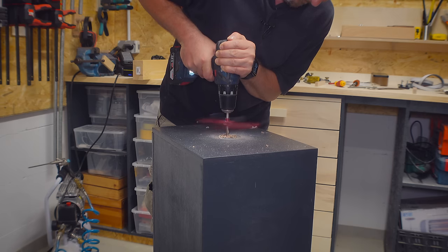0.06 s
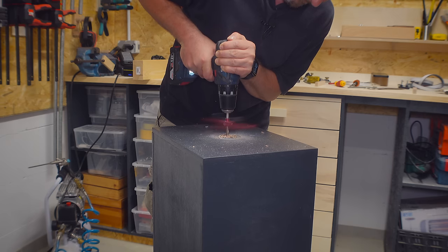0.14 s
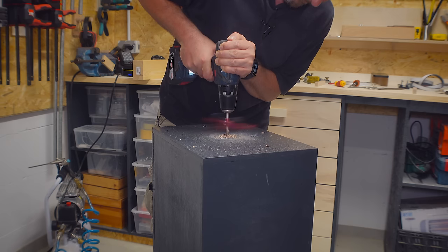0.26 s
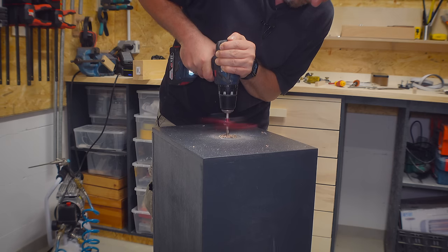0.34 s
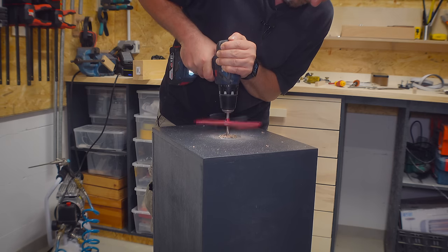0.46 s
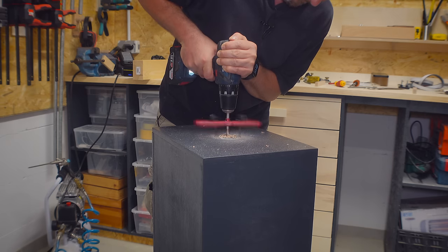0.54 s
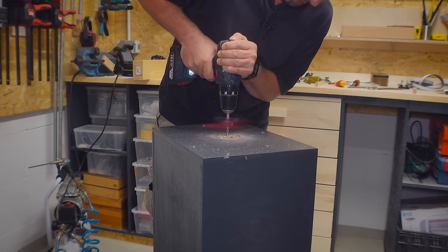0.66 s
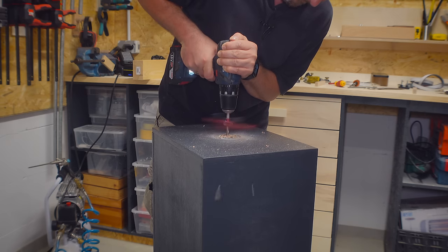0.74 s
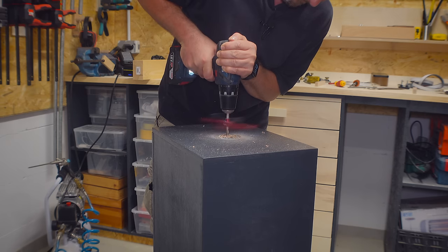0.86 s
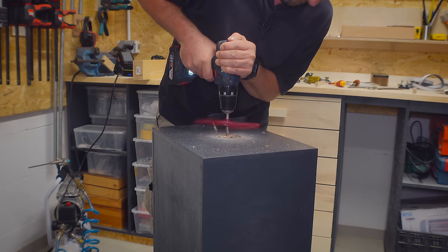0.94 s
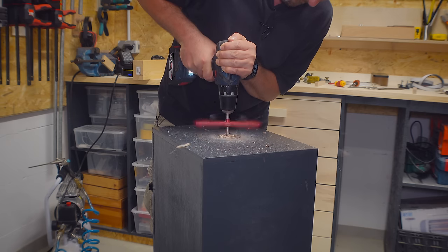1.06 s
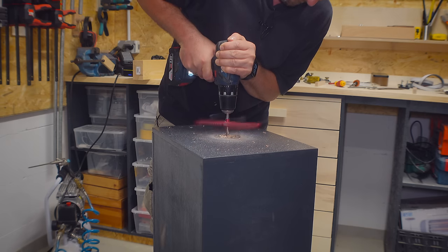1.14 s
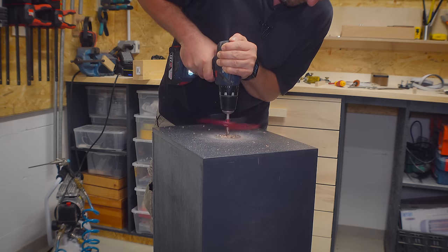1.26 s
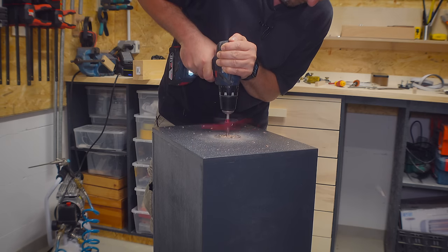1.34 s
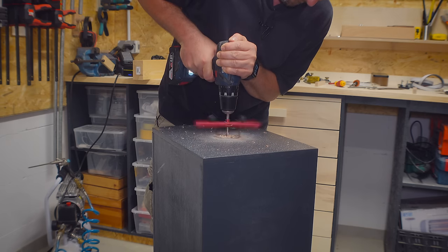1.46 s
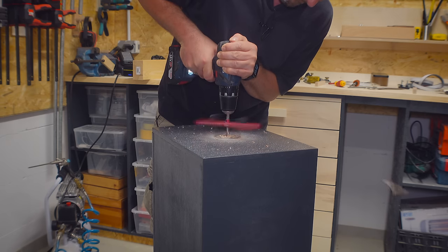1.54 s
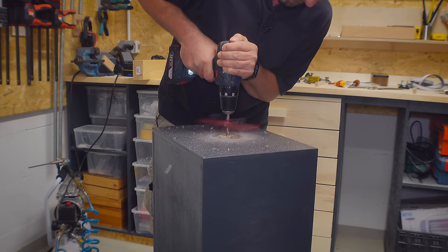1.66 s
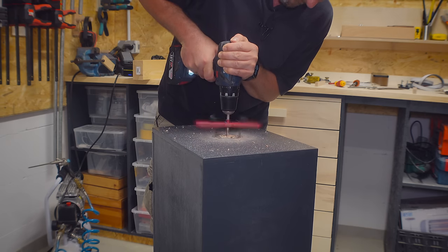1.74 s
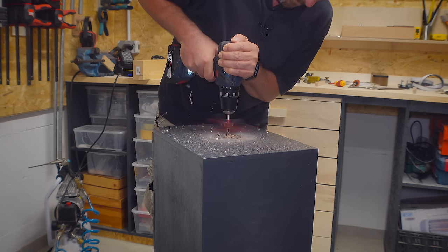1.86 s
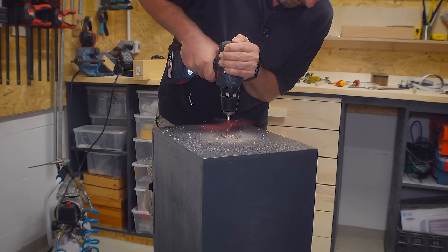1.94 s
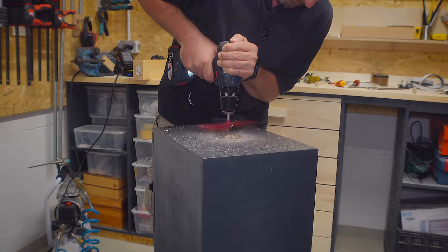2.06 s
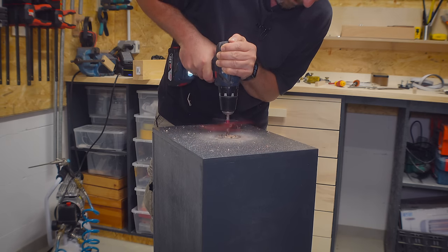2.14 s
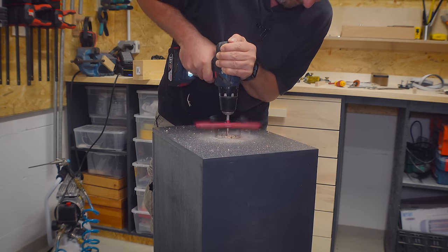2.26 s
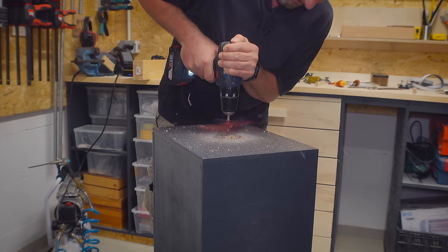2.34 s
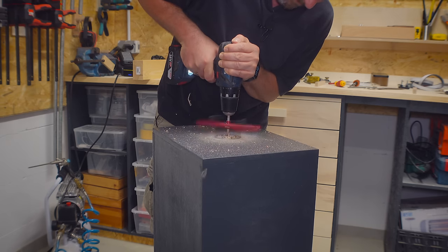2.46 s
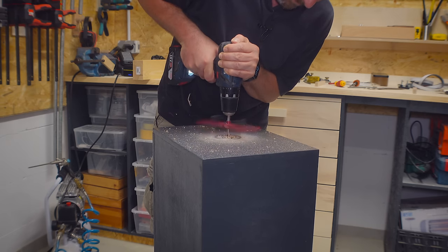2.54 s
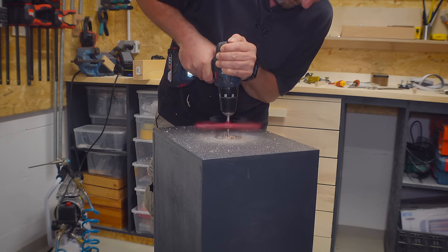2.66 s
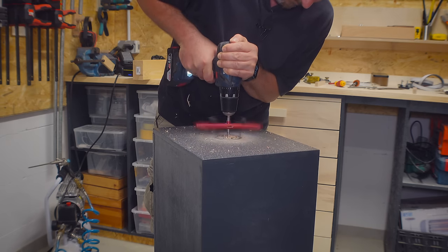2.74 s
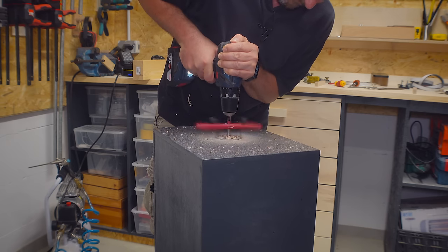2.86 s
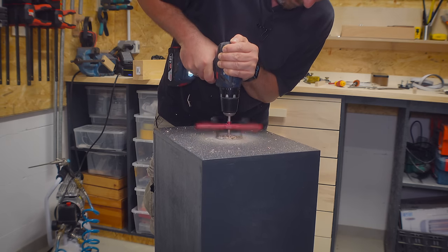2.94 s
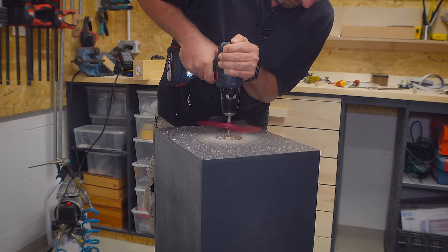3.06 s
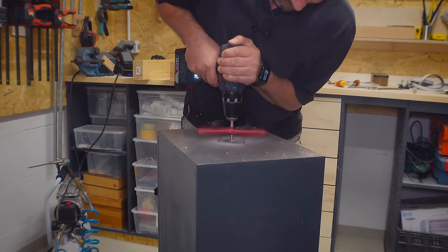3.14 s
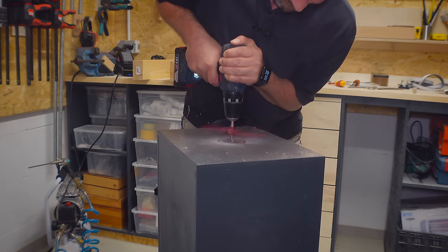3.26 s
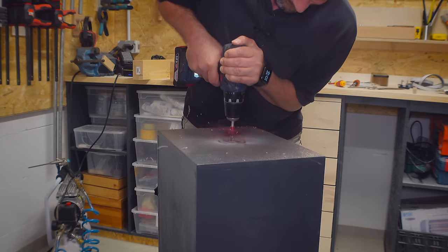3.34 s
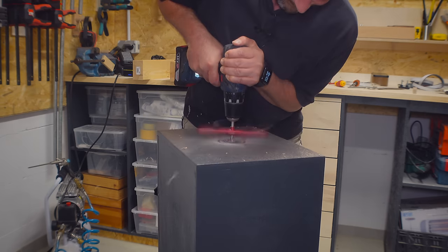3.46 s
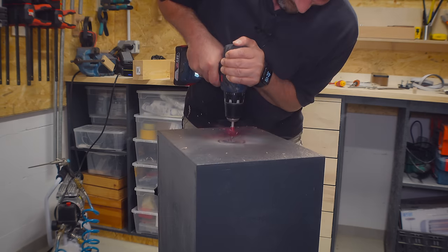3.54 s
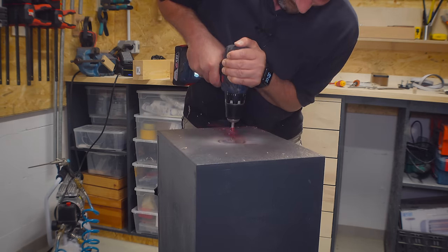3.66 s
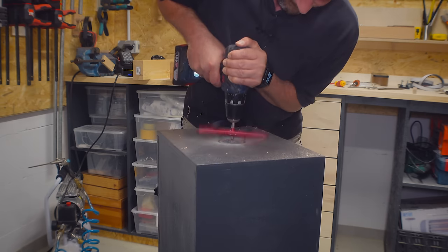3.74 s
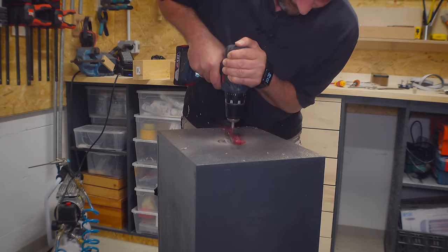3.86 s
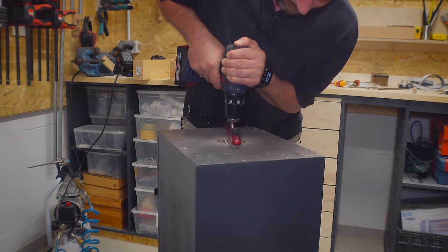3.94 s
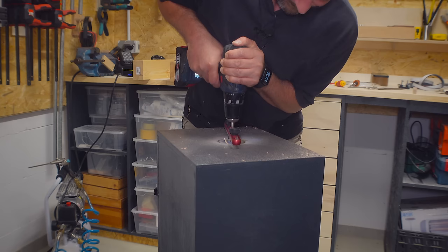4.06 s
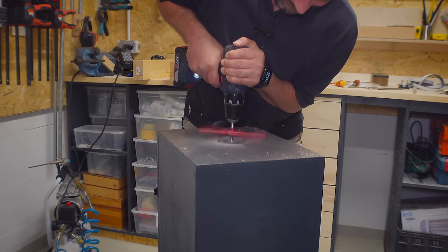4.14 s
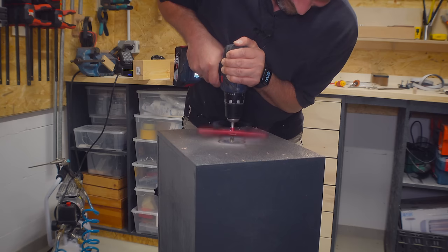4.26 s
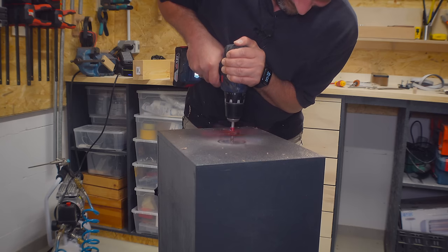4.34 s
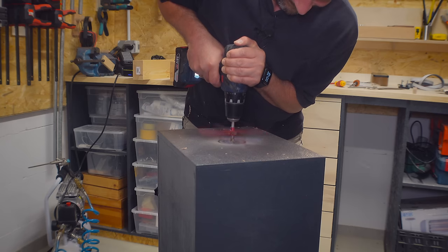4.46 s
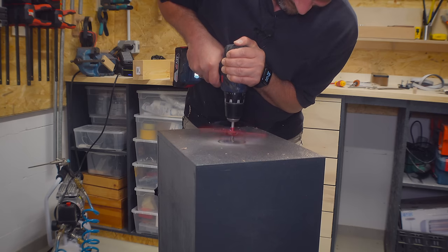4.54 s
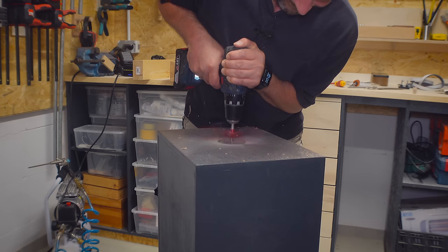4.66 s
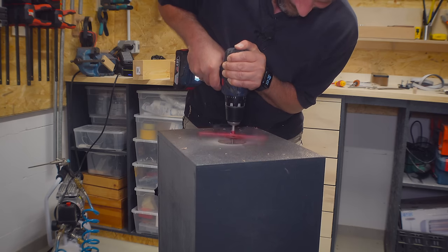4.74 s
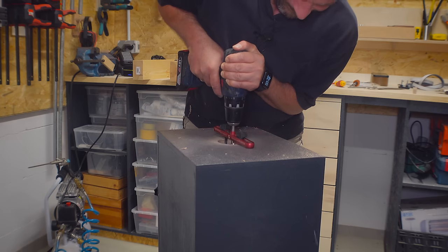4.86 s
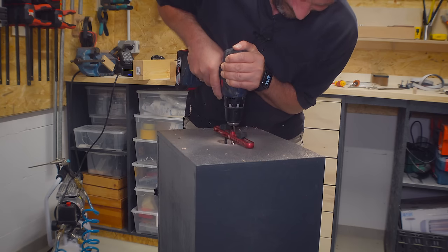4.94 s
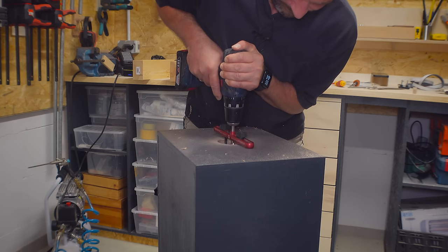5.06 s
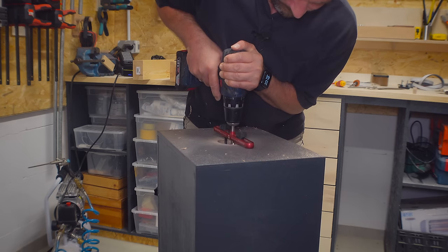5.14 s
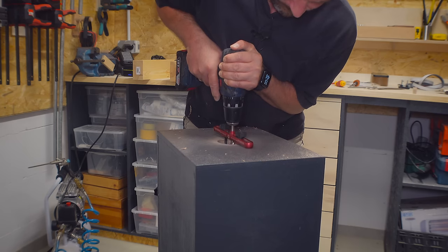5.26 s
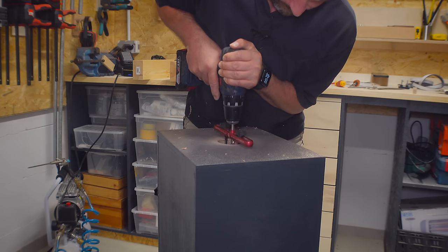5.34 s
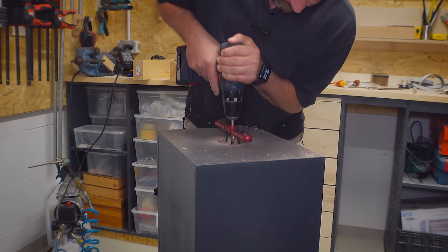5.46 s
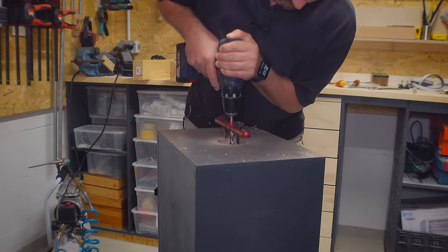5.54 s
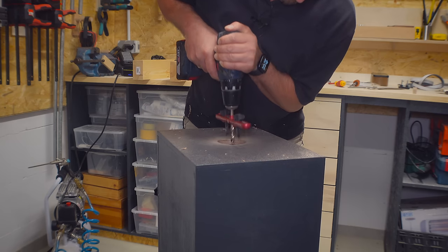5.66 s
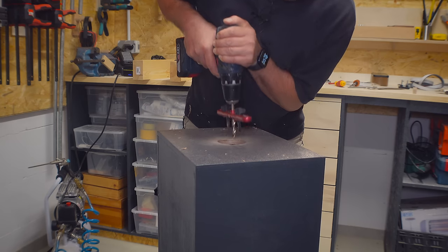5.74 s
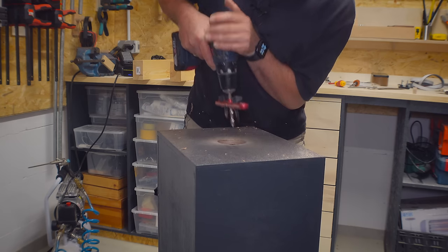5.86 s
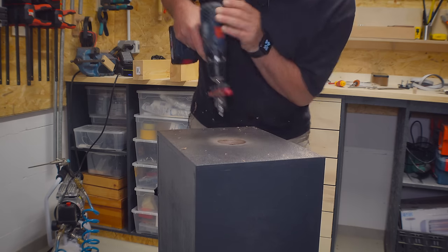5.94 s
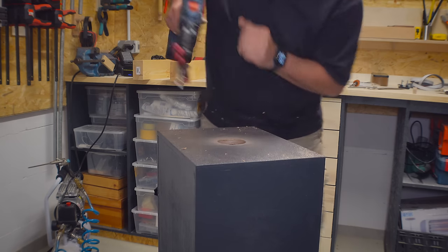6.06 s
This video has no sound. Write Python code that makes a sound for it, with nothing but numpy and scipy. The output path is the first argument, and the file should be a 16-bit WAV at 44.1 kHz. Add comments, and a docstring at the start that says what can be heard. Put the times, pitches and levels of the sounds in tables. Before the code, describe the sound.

In a small workshop, a cordless drill turns a circle cutter in a hollow boxy board. The rasping cut growls and hisses with a wavering gear whine, then bogs down and judders. Abruptly a harsher, squealing cut takes over, stutters, pauses briefly and surges again. The drill stops, the cutter knocks woodily in its groove, and faint cloth rustles as it is lifted. Fairly close microphone, short room reverberation.

```python
"""A rasping, juddering cut is heard first: a cordless drill drags a circle cutter round a boxy board. Its
blades stick and slip, exciting board and blade resonances and tearing chips, in a small workshop. The gear
whines at its tooth rate and the tips squeal; the scene changes to a second cut in trigger pulls. The drill
stops, the cutter knocks in its groove as decaying modes, and it is lifted out with a rustle."""
import sys
import numpy as np
from scipy import signal
from scipy.fft import rfft, irfft
from scipy.io import wavfile
from scipy.ndimage import uniform_filter1d, map_coordinates

SR = 44100
rng = np.random.default_rng(int(sys.argv[2]) if len(sys.argv) > 2 else 0)


def dump(signal):
    """Clip the signal to [-1, 1] and save it as 16-bit WAV at the path in sys.argv[1]."""
    limited = np.clip(np.atleast_2d(signal).T, -1, 1)
    pcm = np.round(limited * 32767).astype(np.int16)
    wavfile.write(sys.argv[1], SR, pcm)


N = 269007
T = np.arange(N) / SR

CHANGE_S = 3.174  # the scene changes abruptly to the second cut
LOOSE_S = 2.52  # the first groove is cut and the blades work loose
CATCH_BUILD_S = 0.002  # build-up of a judder, and return of the cutting after a catch
BOARD_SHIFT = 0.03  # rms share by which the board's resonances drift at random

# How the board radiates its vibration. Each row: frequency in Hz, gain in dB.
BOARD_RADIATION = [(25, -12.5), (70, 12), (150, -2.5), (400, -4), (1300, 0), (2000, -4), (3000, -24),
                   (6000, -22.5), (16000, -44)]
# Resonances of the board shaken by a juddering blade. Each row: frequency in Hz, width in Hz, gain in dB.
LOOSE_BOARD_MODES = [(131.9, 54, -16), (246, 56, -1.5), (324, 130, -2), (463, 90, 4), (663, 130, 0),
                     (1030, 130, -6), (1230, 130, -11.5), (1627, 240, -18.5)]
# Spectrum of the chips off a fresh face. Each row: frequency in Hz, gain in dB.
FRESH_CHIP_SPECTRUM = [(500, 0.5), (2500, 2), (3300, -5.5), (4100, 2), (4900, 4), (5700, -1.5), (6700, 5),
                       (8500, -4.5), (9900, 1.5), (12000, -2.5), (13200, -1.5), (15700, -12.5)]
# The hardest catches of a blade in the groove. Each row: start in seconds, peak level of the judder
# in dB before a common trim, its middle pitch in Hz, peak of the crack in dB relative to the judder.
CATCHES = [(0.360, -17, 495, -13.5), (.445, -17, 495, -5.5), (0.883, -14.5, 583, -9.5),
           (2.27, -16, 483, -9), (2.311, -15, 432, -37), (2.532, -23, 702, -7), (2.58, -22, 428, -12),
           (2.615, -18.5, 520, -10), (2.656, -18.5, 452, -18), (2.701, -17.5, 448, -16),
           (2.735, -20.5, 245, -17.5), (2.766, -21.5, 435, -18), (2.9, -22.5, 240, -18),
           (2.974, -19.5, 498, -14), (3.175, -13, 460, -4), (3.188, -20, 500, -11.5),
           (3.213, -22.5, 442, -12), (3.228, -11.5, 433, -5.5), (3.262, -16.5, 441, -17),
           (3.29, -17.5, 450, -15), (3.328, -15.5, 418, -9), (3.342, -13, 448, -8),
           (3.365, -15, 493, -10.5), (3.425, -16.5, 440, -10), (3.484, -16.5, 419, -12.5),
           (3.502, -22, 480, -12), (3.547, -18, 480, -6.5), (3.561, -17.5, 680, -10),
           (3.731, -13.5, 1035, -13), (3.805, -16.5, 475, -29), (3.832, -25, 576, 3.5),
           (3.897, -18.5, 472, -30), (3.938, -27, 466, -6.5), (4.245, -16.5, 465, -10),
           (4.289, -13, 467, -11.5), (4.33, -22.5, 500, -7.5), (4.363, -16, 430, -2),
           (4.398, -16.5, 479, -12.5), (4.415, -13.5, 445, -4.5), (4.477, -18.5, 459, 1.5),
           (4.516, -20.5, 471, 0.5), (4.535, -14.5, 455, -8.5), (4.573, -21.5, 440, -13),
           (4.594, -13.5, 680, -16.5), (4.656, -14.5, 475, -20), (4.711, -24.5, 462, -21),
           (4.803, -31, 476, -3), (4.856, -28, 480, -12)]
# The stopped cutter knocks. Each row: start in seconds, peak level in dB, dulling corner in Hz,
# length of the ring as a factor.
KNOCKS = [(5.238, -18, 9070, 1.04), (5.243, -22.5, 3200, .85), (5.252, -21.5, 3380, 0.93),
          (5.266, -27, 2390, 0.93), (5.405, -33.5, 1000, 2)]
# First cut, how hard the blades are pressed in. Each row: time in seconds, board rumble in dB
# before a small trim.
PRESSURE = [(0.0, -28), (0.35, -28), (0.62, -28.5), (0.85, -26.5), (1.0, -28.5), (1.55, -30.5),
            (1.78, -28.5), (2.14, -29.5), (2.29, -26.5), (2.4, -34), (2.53, -32.5), (2.63, -29.5),
            (2.75, -28.5), (2.83, -34), (2.98, -31), (3.1, -38.5), (3.17, -37.5)]
# The blade tips sing in the groove. Each row: time in seconds, pitch in Hz, level in dB.
SONG = [(0, 3250, -59), (.7, 3100, -49.5), (1.15, 3264, -47), (1.45, 3210, -53), (1.85, 3080, -60.5),
        (2.0, 2580, -73), (2.655, 2305, -59), (2.68, 2770, -42), (2.72, 3020, -52), (2.77, 2850, -49.5),
        (2.81, 2400, -61), (3.165, 2490, -52), (3.2, 2620, -47.5), (3.47, 2830, -46.5), (3.53, 3110, -44.5),
        (3.62, 2930, -40), (3.74, 2456, -56.5), (3.99, 1798, -100), (4.16, 1705, -100), (4.27, 1998, -48),
        (4.35, 2800, -42.5), (4.41, 3116, -44), (4.53, 3226, -39), (4.79, 3300, -40), (4.83, 3330, -43.5),
        (4.91, 3220, -52), (5.0, 3010, -130)]


def undb(db):
    """Logarithmic level: decibels become an amplitude gain."""
    return 10 ** (np.asarray(db) / 20)


def curves(table):
    """Linear interpolation: the columns of a table of timed rows, at every sample."""
    s, *columns = np.transpose(table)
    return [np.interp(T, s, c) for c in columns]


def ramp(start_s, length_s):
    """Linear onset: rises from 0 to 1 and stays there."""
    return np.clip((T - start_s) / length_s, 0, 1)


def swell(start_s, end_s, rise_s, fall_s):
    """Envelope: attack, hold and release between 0 and 1."""
    return ramp(start_s, rise_s) * (1 - ramp(end_s, fall_s))


def lag(x, time_s):
    """Inertia: a first-order low-pass makes a control approach its target exponentially."""
    keep = np.exp(-1 / (time_s * SR))
    return signal.lfilter([1 - keep], [1, -keep], x)


def unit(x, band=None):
    """Normalisation: scale to a standard deviation of 1, overall or within a band."""
    if band is None:
        return x / np.std(x)
    band_pass = signal.butter(4, band, "band", fs=SR, output="sos")
    return x / np.std(signal.sosfilt(band_pass, x))


def add(track, s, sound):
    """Superposition: mix a sound in at a time."""
    i = max(int(s * SR), 0)
    track[i:i + len(sound)] += sound[:max(N - i, 0)]


def colour(x, points, size=2048):
    """Minimum-phase filtering: a causal response through (Hz, dB) points, by the folded cepstrum."""
    hz, db = np.transpose(points)
    grid = np.maximum(np.arange(size // 2 + 1) * SR / size, 1)
    cepstrum = irfft(np.log(undb(np.interp(np.log(grid), np.log(hz), db))))
    cepstrum[1:size // 2] *= 2
    cepstrum[size // 2 + 1:] = 0
    impulse = irfft(np.exp(rfft(cepstrum)))
    return signal.oaconvolve(x, impulse)[:len(x)]


def resonate(x, modes):
    """Modal superposition: parallel resonances, neighbours moving in opposite directions."""
    total = 0
    for k, (hz, width, db) in enumerate(modes):
        b, a = signal.iirpeak(hz, hz / width, SR)
        total = total + (-1) ** k * undb(db) * signal.lfilter(b, a, x)
    return total


def bend(x, ratio):
    """Time warping: reading a sound at a changing rate shifts all its pitches by that ratio."""
    return map_coordinates(x, [np.cumsum(ratio * np.ones(N))], mode="mirror")


def walk(rate):
    """Random modulation: smoothed chance values, rate per second, with a spread of 1."""
    k = max(int(SR / rate), 1)
    held = np.repeat(rng.standard_normal(N // k + 1), k)[:N]
    return unit(uniform_filter1d(held, k))


def grains(rate, spread_db):
    """Shot noise of fibres snapping: clicks of random sign, size and time, rate per second."""
    snaps = rng.random(N) < rate / SR
    return unit(snaps * rng.choice([-1, 1], N) * undb(spread_db * rng.uniform(-1.1, 1, N)))


def stick_slip(rate, jitter, spread_db, spray_s):
    """Stick-slip friction: uneven slips of the blades, each followed by a decaying spray of chips."""
    count = np.floor(np.cumsum(rate * np.exp(jitter * walk(rate))) / SR)
    slips = np.diff(count, prepend=0) * undb(spread_db * rng.uniform(-0.96, 1, N))
    spray = signal.lfilter([1], [1, -np.exp(-1 / (spray_s * SR))], slips)
    return unit(slips), spray / np.sqrt(np.mean(spray ** 2))


def whine(hz, width_hz, clean):
    """Narrow-band modulation: a steady core plus random sidebands, around a wavering rate."""
    low_pass = signal.butter(2, width_hz / 2, fs=SR, output="sos")
    smear = unit(signal.sosfilt(low_pass, rng.standard_normal((2, N))))
    waver = 1 + .011 * walk(70) + .016 * walk(400)
    phase = 2 * np.pi * np.cumsum(hz * waver) / SR
    line = (clean + smear[0]) * np.cos(phase) + smear[1] * np.sin(phase)
    return unit(line * undb(2 * walk(50)))


def background():
    """Shaped broadband noise: still workshop air, and sleeves rustling as the drill is lifted."""
    # The rustle of sleeves. Each row: time in seconds, level in dB.
    rustle_levels = [(5.6, -81.5), (5.85, -84), (5.905, -65.5), (5.96, -77), (5.995, -75), (6.04, -63),
                     (6.1, -65)]
    # Spectra of the cloth and of the air. Each row: frequency in Hz, gain in dB.
    cloth_spectrum = [(24, -38.5), (60, -12), (153, -9), (260, -17), (15000, -32)]
    air_spectrum = [(15, -30.5), (30, -7), (500, -7), (1280, -14), (15000, -28.5)]
    air_db = -79.5
    rustle = unit(colour(grains(rate=10000, spread_db=8.0) * undb(2.3 * walk(64)), cloth_spectrum))
    air = unit(colour(rng.standard_normal(N), air_spectrum))
    return rustle * undb(curves(rustle_levels)[0]) + undb(air_db) * air


def workshop(x, wet_db, low_t60, high_t60, size=26000):
    """Reverberation: cluttered walls return decaying noise, with its own t60 below and above 1800 Hz."""
    t = T[:size]
    low_pass = signal.butter(2, 1800, fs=SR, output="sos")
    high_pass = signal.butter(2, 1800, "high", fs=SR, output="sos")
    low = signal.sosfilt(low_pass, rng.standard_normal(size)) * undb(-60 * t / low_t60)
    high = signal.sosfilt(high_pass, rng.standard_normal(size)) * undb(-60 * t / high_t60)
    tail = (low + 0.64 * high) * (t > .005)
    return x + undb(wet_db) * signal.oaconvolve(x, tail / np.linalg.norm(tail))[:N]


def boom():
    """Cavity resonance: each knock sets the air in the box swinging at one low pitch."""
    boom_hz, t60_s = 68, 0.57
    relative_db = -47  # level relative to the knock, before the halving below
    total = 0
    for s, db, *_ in KNOCKS:
        decay = undb(db + relative_db - 60 * np.maximum(T - s, 0) / t60_s)
        total = total + ramp(s, .01) * np.sin(2 * np.pi * boom_hz * T) * decay
    return total / 2


def knocks(size=14000):
    """Impact on a modal body: decaying modes and a crunch build up, then pass the contact's low-pass."""
    # Modes of the knock. Each row: frequency in Hz, level in dB, t60 in seconds before the length factor.
    knock_modes = [(236.4, -7.5, 0.14), (310, 0, 0.042), (417, 6, 0.03), (537, -5, 0.048),
                   (625, 7.5, 0.043), (748, -6, 0.059), (870, -1, 0.06), (1104, -1.5, 0.074),
                   (1470, -10, 0.038), (1780, -13, 0.042), (2200, -14, 0.068), (3070, -6.5, 0.031)]
    crunch_spectrum = [(150, -16), (500, 9.0), (1200, 2.5), (3200, -10), (4600, -30.0), (15000, -30)]
    out, t = np.zeros(N), T[:size]
    for s, db, corner_hz, length in KNOCKS:
        ring = np.zeros(size)
        for k, (hz, mode_db, t60) in enumerate(knock_modes):
            detune = 1 + 0.0066 * rng.standard_normal()
            decay = undb(mode_db - 60 * t / (t60 * length))
            ring += (-1) ** k * decay * np.sin(2 * np.pi * hz * t * detune)
        crunch = colour(rng.standard_normal(size) * undb(-60 * t / (0.11 * length)), crunch_spectrum)
        contact = (ring + 2 * crunch) * (1 - np.exp(-t / 0.0024))
        low_pass = signal.butter(4, min(corner_hz, SR / 3), fs=SR, output="sos")
        hit = signal.sosfilt(low_pass, contact)
        add(out, s, undb(db) * hit / abs(hit).max())
    return out


def switch():
    """Damped impact: a dry plastic click of the trigger switch before the last pull."""
    start_s, level_db, t60_s = 4.157, -44, 0.041
    click = unit(colour(rng.standard_normal(N), [(200, -1.0), (900, 16), (6000, -9.5)]))
    decay = undb(level_db - 60 * np.maximum(T - start_s, 0) / t60_s)
    return click * ramp(start_s, 0.00064) * decay


def panel():
    """Driven resonance: slips of the blades keep the board's top panel droning at its lowest pitch."""
    mode = [(241.8, 24, 0)]  # Hz, width Hz, dB; applied twice
    return unit(resonate(resonate(grains(rate=400, spread_db=3), mode), mode))


def chatter(drag_gain):
    """Bending vibration: the cutter arm sounds in uneven fits under drag, and twangs when plucked."""
    # The arm twangs as it stops and is eased out of the groove.
    # Each row: start in seconds, rms level in dB, pitch in Hz, t60 in seconds.
    twangs = [(5.002, -49, 688, 0.094), (5.384, -57.5, 458, 0.65), (5.648, -62.5, 458, 0.15)]
    arm_hz, twang_rise_s = 465, 0.0026
    wander = 2 * np.pi * np.cumsum(1 + .035 * walk(45) + .05 * walk(200)) / SR
    surge = unit(undb(4 * walk(80)))
    plucked = 0
    for s, db, hz, t60 in twangs:
        decay = undb(db - 60 * np.maximum(T - s, 0) / t60)
        plucked = plucked + np.sin(2 * np.pi * hz * T) * ramp(s, twang_rise_s) * decay
    return unit(np.sin(arm_hz * wander) * surge) * drag_gain + np.sqrt(2) * plucked


def gears(tooth_hz):
    """Gear meshing: a line at the tooth rate, louder with speed and smeared by the jerking shaft."""
    # What the drill's shell lets out. Each row: frequency in Hz, gain in dB.
    housing = [(1000, -1.5), (2400, -6.5), (3000, -6), (3250, 7.5), (4000, 3), (4900, -3.5), (5400, -9),
               (6000, -18)]
    reference_hz, db_per_octave = 5130, 13.5
    speed_db = db_per_octave * np.log2(tooth_hz / reference_hz)
    labour = np.interp(tooth_hz, [3700, 4500], [1, 0]) * (T < CHANGE_S)  # first cut only
    free = whine(tooth_hz, width_hz=260, clean=.95)
    smeared = whine(tooth_hz, width_hz=700, clean=0)
    line = np.sqrt(1 - labour) * free + np.sqrt(labour) * smeared
    # once the blades are dug in, the line comes and goes, most at high speed
    broken = undb(np.interp(tooth_hz, [4000, 5000], [1, 4]) * ramp(1, .5) * walk(50))
    return colour(line * broken * undb(speed_db - 6.5), housing)


def song():
    """Friction squeal: the tips sing a ragged band in the first groove, a clearer line on the fresh face."""
    hz, db = curves(SONG)
    free = .65 * (T > CHANGE_S)
    ragged = whine(hz, width_hz=450, clean=.35) * undb(2 * walk(80))
    clear = whine(hz, width_hz=220, clean=.9)
    return (np.sqrt(1 - free) * ragged + np.sqrt(free) * clear) * undb(db)


def spurts():
    """Gated shot noise: clogged chips break free in short bright bursts."""
    # Spurts of chips in the second cut. Each row: start in seconds, length in seconds, level in dB.
    spurt_times = [(3.221, 0.0096, -44), (3.671, 0.014, -37), (3.773, 0.013, -42.5), (3.835, 0.01, -44),
                   (4.217, 0.018, -38), (4.927, 0.0093, -46)]
    gain = sum(undb(db) * swell(s, s + length, rise_s=0.01, fall_s=0.007) for s, length, db in spurt_times)
    return gain * unit(colour(grains(rate=9000, spread_db=6.0), FRESH_CHIP_SPECTRUM), (4000, 15000))


def catches(size=6000):
    """Release of stored strain: a snagged blade judders on the board and lets go with a splintering crack."""
    shake_t60_s, judder_t60_s = 0.024, 0.048
    sag = 0.071  # the judder's pitch sinks by this share as it dies
    crack_spectrum = [(200, -13.0), (1200, 8.5), (2400, 1.5), (15000, -21.5)]
    out, t = np.zeros(N), T[:size]
    fade = undb(-60 * t / shake_t60_s) * (1 - np.exp(-t / 0.0012))
    swing = undb(-60 * t / judder_t60_s) * (1 - np.exp(-t / CATCH_BUILD_S))
    travel = np.cumsum(1 + sag * (np.exp(-t / 0.0089) - .5)) / SR
    for s, db, hz, crack_db in CATCHES:
        shake, splinters = rng.standard_normal((2, size))
        blade = unit(np.sin(2 * np.pi * hz * travel) * swing)
        board = unit(colour(resonate(shake * fade, LOOSE_BOARD_MODES), BOARD_RADIATION))
        judder = blade + 0.55 * board
        crack = colour(splinters * fade, crack_spectrum)
        both = judder / abs(judder).max() + undb(crack_db) * crack / abs(crack).max()
        add(out, s, undb(db - 1.5) * both)
    return out


def stuck():
    """Static friction: the cutting falls away while a blade snags, and is back as the blade lets go."""
    stuck_s, stuck_db = 0.017, -2.5  # half that depth in dB before LOOSE_S
    snags = [swell(s - stuck_s, s, stuck_s / 2, CATCH_BUILD_S) for s, *_ in CATCHES]
    return undb(stuck_db * np.max(snags, axis=0) * np.where(T < LOOSE_S, .5, 1))


def groove_db(fade):
    """Muffling by depth: a first-cut layer follows the pressure and shifts as the groove deepens."""
    usual_pressure_db, loosen_s = -28, 0.089
    start_db, lost_db, power, loose_db, share = fade
    pressed_db = curves(PRESSURE)[0] - usual_pressure_db
    deepening_db = lost_db * ramp(0, LOOSE_S) ** power
    return start_db - deepening_db - loose_db * ramp(LOOSE_S, loosen_s) + share * pressed_db


def hollow(x):
    """Subtractive resonance: the groove carves broad, deepening dips into the hiss leaving it."""
    # Centre frequencies of the dips in Hz.
    dips_hz = [2830, 5500, 10650]
    dip_q, full_depth = 5.5, .4  # depth as a share, 0-1, of each pass
    depth = full_depth * ramp(start_s=0.41, length_s=0.93)
    for hz in dips_hz * 2:  # twice over for a broad floor
        b, a = signal.iirpeak(hz, dip_q, SR)
        x = x - depth * signal.lfilter(b, a, x)
    return x


def trigger(tooth_hz):
    """Speed-dependent grip: each pull sets the blades biting, less at low speed; gives six layer gains."""
    # Pulls of the trigger. Each row: start in seconds, release in seconds, then the levels in dB, before
    # the changes below, of board, scrape, chips, arm chatter, panel drone and gear whine.
    pulls = [(3.099, 3.759, -30.5, -42.5, -43.5, -37, -42.5, -36),
             (3.769, 3.858, -37.5, -41, -46.5, -36, -58, -40),
             (3.859, 3.95, -38, -49, -51.5, -44, -41.5, -42.5),
             (4.164, 4.905, -32, -46.5, -40.5, -35.5, -42.5, -37.5)]
    # Changes in dB of the same six layers as the surface tears up, and as the blades break through.
    tear_changes = (3.5, 6.5, 5, -15, -4.5, -4.5)
    through_changes = (-9.5, -9.5, -2.5, -4.5, -19, -5.5)
    bite_hz, bite_power = 3297, 0.99  # below this tooth rate the blades only skim
    grip_s = 0.02  # lag of the blades' grip behind the trigger
    held = np.array([(T >= start) & (T < release) for start, release, *_ in pulls], float)
    tear = swell(3.49, 3.7, rise_s=0.25, fall_s=0.074)
    through = ramp(4.66, 0.058)  # the load falls
    bite = np.minimum(tooth_hz / bite_hz, 1) ** bite_power
    gains = []
    for db, tear_db, through_db in zip(np.transpose(pulls)[2:], tear_changes, through_changes):
        grip = lag(undb(db) @ held, grip_s)
        gains.append(bite * grip * undb(tear_db * tear + through_db * through))
    return gains


def first_cut(sweep):
    """Source and resonator: blades deep in a groove drive board, blade, rubbing and chips, then work loose."""
    # Resonances of the tight board, the blade and its rubbing flank.
    # Each row: frequency in Hz, width in Hz, gain in dB.
    tight_board_modes = [(150.2, 40, -20), (264.4, 34.6, -10), (298, 57, -7.5), (457, 59, 1.5),
                         (552, 78, 0), (675, 161, -4), (880, 86, -7), (1039, 150, -11), (1327, 53.5, -2.5),
                         (1350, 197, -9.5)]
    blade_modes = [(1880, 1100, -14.5), (2330, 250, -1.5), (2555, 190, -13)]
    rubbing_modes = [(4880, 480, 2), (6650, 1100, 3.5), (7800, 880, 1), (9430, 470, -8), (12700, 480, -1)]
    # Spectra of blade, rubbing and chips. Each row: frequency in Hz, gain in dB.
    blade_radiation = [(100, -29.5), (1200, 5), (2000, 3), (2600, 10), (2850, -16), (4200, -21.5),
                       (6000, -21.5), (16000, -41)]
    rubbing_radiation = [(2000, -12.5), (4700, -3), (8000, 4), (15500, 2)]
    chip_spectrum = [(300, -9), (1500, -0.5), (2800, 10.5), (3230, 7.5), (3700, -1), (4300, 1.5),
                     (5600, 0.5), (8500, -2), (10300, -1.5), (11400, -2.5), (13300, 1.5), (15700, -11)]
    # A blade's flank rubs the wall of the groove. Each row: start in seconds, end in seconds, level in dB.
    rub_times = [(-.2, 1.4, -48), (1.17, 2.052, -47), (2.15, 2.445, -51.5)]
    # Fades with the deepening groove: dB at the start, dB lost by the end of the groove, power of that
    # fall, dB more lost once loose (negative: gained), share of the pressure.
    blade_fade = (-35, 8, 1, 7.5, .5)
    chip_fade = (-45, 17, 2, -4.5, 0.5)
    rub_edge_s, light_rub_db = 0.12, -62  # rise and fall of a rub; what is left between rubs
    blade_shift = .02  # rms share by which the blade's resonances drift at random
    buried_pitch = 0.913  # pitch of a blade buried in chips, as a share of its free pitch
    lopsided_db, lopsided_s = 1, 0.65  # one-sided bite at first: pulsing depth, and how fast it evens out

    slips, spray = stick_slip(rate=200, jitter=.45, spread_db=5.5, spray_s=0.0058)
    bite_db = 1.0 * sweep + 1.0 * walk(65)
    force = (slips + 1.67 * grains(rate=2500, spread_db=10.0)) * undb(bite_db)
    depth = np.interp(T, [1.6, 2.5], [0, 1])

    def shaken_board(modes):
        """Modal response to the cutting force, with drifting pitch."""
        sound = unit(colour(resonate(force, modes), BOARD_RADIATION), (200, 1200))
        return bend(sound, 1 + BOARD_SHIFT * walk(25))

    board = np.sqrt(1 - depth ** 2) * shaken_board(tight_board_modes) + depth * shaken_board(LOOSE_BOARD_MODES)
    tearing = grains(rate=8000, spread_db=-1.0) * (1 + 1.0 * spray) * undb(0.33 * bite_db)

    def ringing_blade(pitch):
        """Modal response to the tearing, all modes scaled in pitch."""
        modes = np.multiply(blade_modes, [pitch, 1, 1])
        return unit(colour(resonate(tearing, modes), blade_radiation), (2000, 3000))

    blade = np.sqrt(1 - depth) * ringing_blade(1) + np.sqrt(depth) * ringing_blade(buried_pitch)
    blade = bend(blade, 1 + blade_shift * walk(25))

    friction = grains(rate=16000, spread_db=15.5) * undb(0.63 * bite_db + 1.8 * walk(90))
    rub = unit(colour(resonate(friction, rubbing_modes), rubbing_radiation), (6200, 8200))
    rub_gain = undb(light_rub_db)
    for start, end, db in rub_times:
        rub_gain = rub_gain + undb(db) * swell(start, end, rub_edge_s, rub_edge_s)
    flying = grains(rate=7300, spread_db=5.5) * (1 + 0.23 * spray) * undb(.5 * bite_db)
    chips = unit(colour(flying, chip_spectrum), (9000, 11500))
    hiss = hollow(rub * rub_gain + chips * undb(groove_db(chip_fade)))
    hiss = bend(hiss, 1 + blade_shift / 2 * walk(10))
    pulsing = undb(lopsided_db * np.exp(-T / lopsided_s) * sweep)

    board_db = curves(PRESSURE)[0] - 0.3
    return board * undb(board_db) + blade * undb(groove_db(blade_fade)) + hiss * pulsing


def second_cut(sweep, board_gain, scrape_gain, chip_gain):
    """Source and resonator: coarser slips on a fresh face ring the board and throw a bright spray of chips."""
    # Resonances of the board. Each row: frequency in Hz, width in Hz, gain in dB.
    board_modes = [(143, 41, -13), (243, 36, -5.5), (324, 60, -3.5), (451, 52, 2.5), (615, 87, -2.5),
                   (685, 74, -1.5), (1049, 74, -10), (1242, 130, -16)]
    # Spectrum of the scrape. Each row: frequency in Hz, gain in dB.
    scrape_spectrum = [(200, -20.5), (900, -4.5), (1500, 8), (1900, -1), (2250, 5.5), (2800, -2),
                       (3150, -19), (5000, -6.5), (8000, -19.5), (16000, -42.5)]
    scrape_at_hz, scrape_follow = 2986, .5  # the scrape's colour follows the song's pitch, by this power
    slips, spray = stick_slip(rate=130, jitter=0.64, spread_db=6.0, spray_s=0.0069)
    bite_db = 1.4 * sweep + 1.9 * walk(65)
    force = (slips + 0.82 * grains(rate=1700, spread_db=2.0)) * undb(bite_db)
    board = unit(colour(resonate(force, board_modes), BOARD_RADIATION), (200, 1200))
    board = bend(board, 1 + BOARD_SHIFT * walk(25))
    tearing = grains(rate=8100, spread_db=9.5) * (1 + 2.3 * spray) * undb(bite_db)
    scrape = unit(colour(tearing, scrape_spectrum), (1500, 2600))
    scrape = bend(scrape, (curves(SONG)[0] / scrape_at_hz) ** scrape_follow)
    flow = (1 + .6 * spray) * undb(.75 * bite_db)
    chips = unit(colour(grains(rate=9000, spread_db=-3.5) * flow, FRESH_CHIP_SPECTRUM), (6000, 15000))
    return board * board_gain + scrape * scrape_gain + chips * chip_gain


def scene():
    """Common drive: the motor's speed sets the gear whine and the sweep of the blades round the hole."""
    # Motor speed under the changing load, both cuts. Each row: time in seconds, gear tooth rate in Hz.
    motor_speed = [(0, 5400), (.23, 4940), (.31, 4610), (.41, 4800), (.66, 4116), (.91, 4970), (1.0, 4570),
                   (1.08, 4890), (1.23, 5050), (1.37, 4290), (1.5, 4740), (1.6, 4170), (1.71, 4900),
                   (1.79, 4430), (1.87, 4820), (1.97, 4160), (2.05, 3544), (2.19, 3950), (2.31, 4595),
                   (2.47, 4050), (2.62, 2340), (3.12, 3298), (3.195, 3510), (3.215, 4650), (3.3, 5180),
                   (3.43, 5110), (3.53, 5630), (3.67, 5127), (3.71, 3866), (3.725, 4446), (3.745, 3700),
                   (3.775, 3450), (3.828, 5080), (3.842, 3650), (3.858, 3400), (3.878, 4550), (3.9, 3590),
                   (3.94, 2430), (3.975, 99.1), (4.16, 100), (4.21, 1502), (4.235, 3480), (4.275, 4860),
                   (4.292, 4265), (4.33, 5370), (4.42, 5240), (4.6, 5670), (4.91, 5720), (4.98, 301)]
    # Fades with the deepening groove, of the whine and the panel: dB before any loss, dB lost by the end
    # of the groove, power of that fall (0: at once), dB more lost once loose, share of the pressure;
    # a negative loss is a gain.
    whine_fade = (-39, 6, 0.6, -6.5, 0.5)
    panel_fade = (-51, -12.5, 0, -4.5, 3.5)
    shell_hz, shell_width_hz, shell_db = 4954, 330, 9.5  # in the first cut the whine swells near this rate
    teeth_per_sweep = 190  # gear teeth to one sweep of the blades
    first = T < CHANGE_S
    tooth_hz = np.maximum(curves(motor_speed)[0], 1)
    board_gain, scrape_gain, chip_gain, drag_gain, drone_gain, mesh_gain = trigger(tooth_hz)
    swell_db = shell_db * np.exp(-((tooth_hz - shell_hz) / shell_width_hz) ** 2)
    gear_gain = np.where(first, undb(groove_db(whine_fade) + swell_db), mesh_gain)
    panel_gain = np.where(first, undb(groove_db(panel_fade)), drone_gain)

    sweep = np.cos(2 * np.pi * np.cumsum(tooth_hz / teeth_per_sweep) / SR)
    slipping = stuck()
    cut = np.where(first, first_cut(sweep), second_cut(sweep, board_gain, scrape_gain, chip_gain))
    cutting = cut * slipping + song() + catches() + spurts()
    drill = cutting + gear_gain * gears(tooth_hz) + panel() * panel_gain + switch()

    room = workshop(drill, wet_db=-17.0, low_t60=0.3, high_t60=0.29)
    room += workshop(knocks(), wet_db=-23.0, low_t60=0.59, high_t60=0.52)
    arm = chatter(drag_gain * slipping * ~first)  # dragged in the second cut only
    return (room + boom() + arm + background())[None]


def record(dry):
    """Band limiting: a steep elliptic low-pass removes the top of the treble."""
    top_hz = 15800
    return signal.sosfilt(signal.ellip(10, .2, 80, top_hz, fs=SR, output="sos"), dry)


dry = scene()
out = record(dry)
dump(out)
```